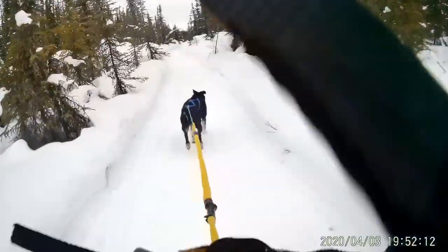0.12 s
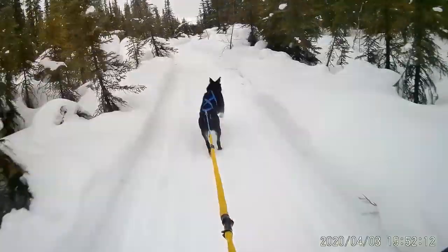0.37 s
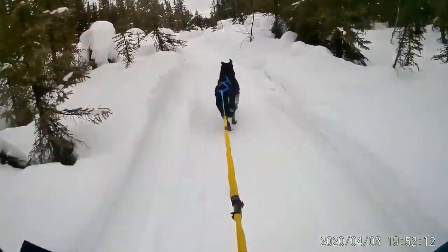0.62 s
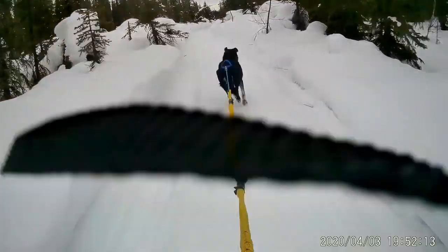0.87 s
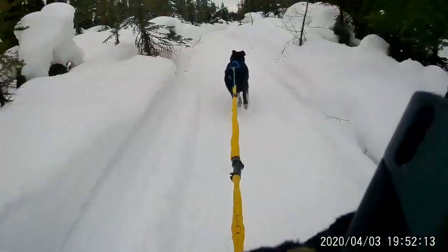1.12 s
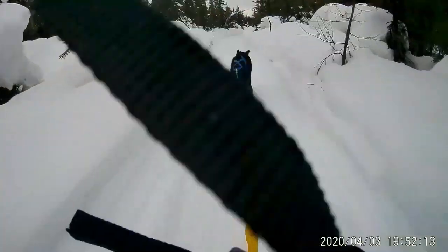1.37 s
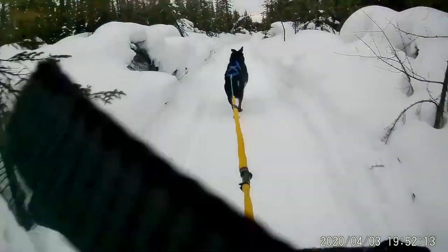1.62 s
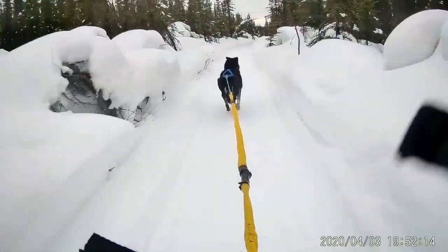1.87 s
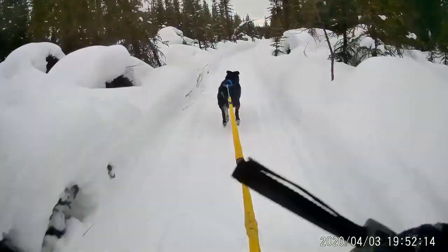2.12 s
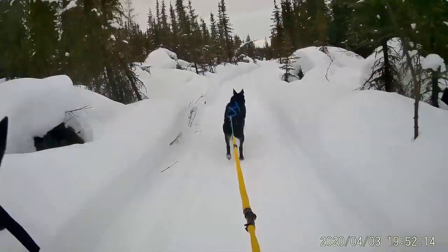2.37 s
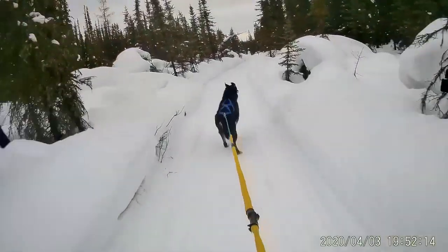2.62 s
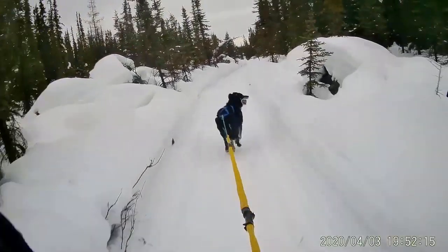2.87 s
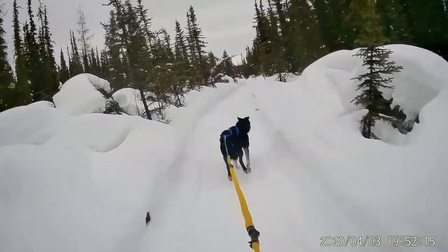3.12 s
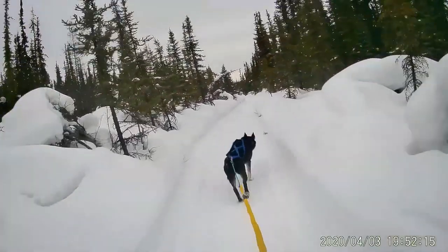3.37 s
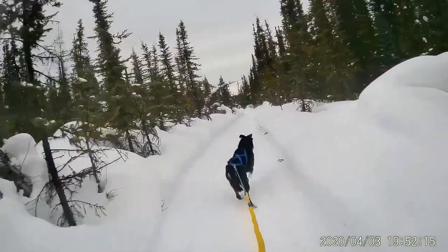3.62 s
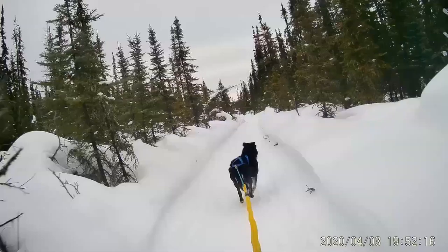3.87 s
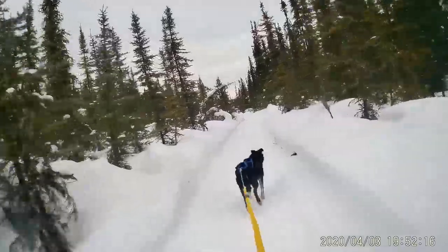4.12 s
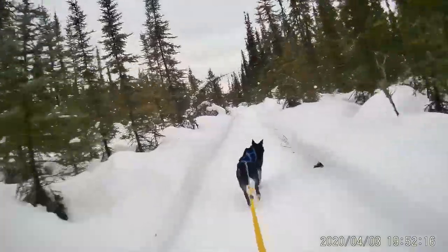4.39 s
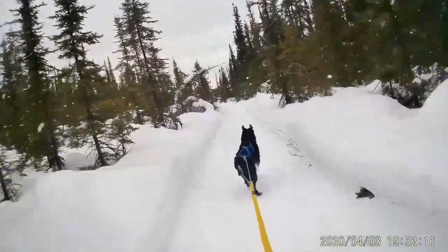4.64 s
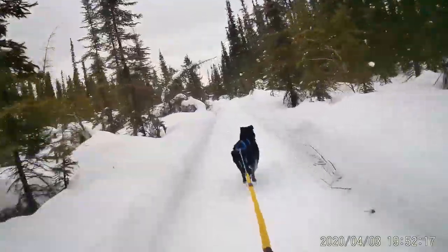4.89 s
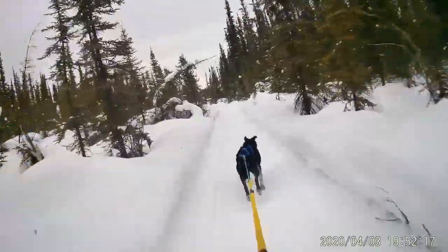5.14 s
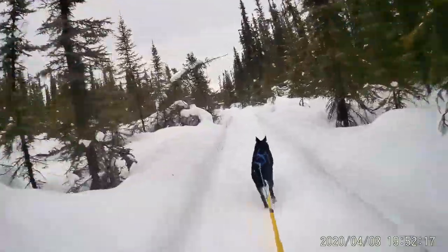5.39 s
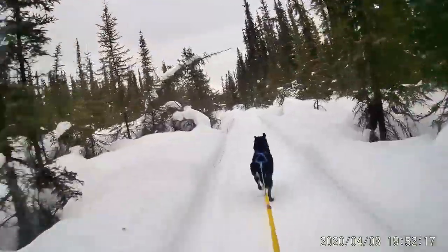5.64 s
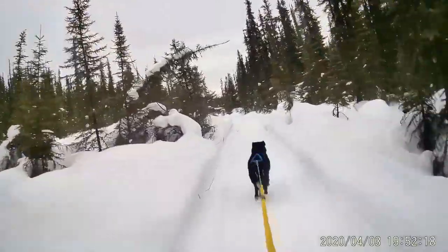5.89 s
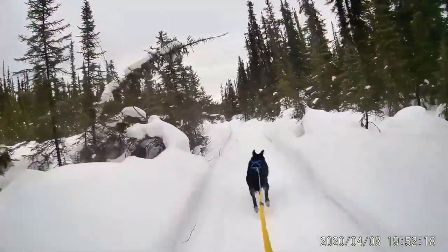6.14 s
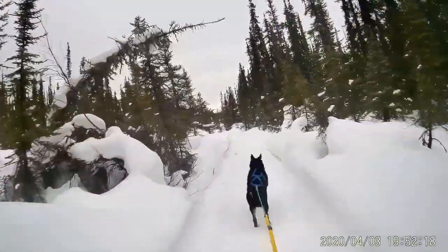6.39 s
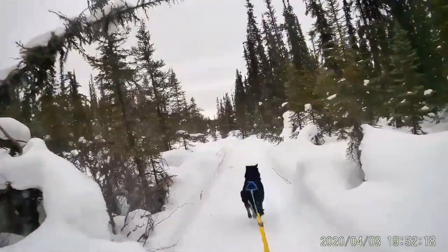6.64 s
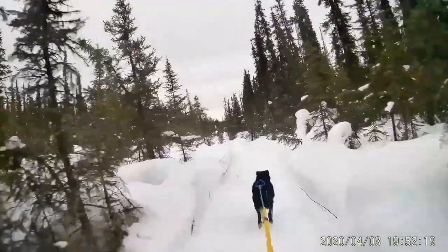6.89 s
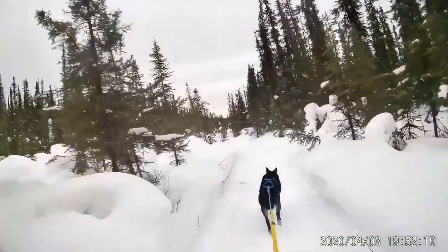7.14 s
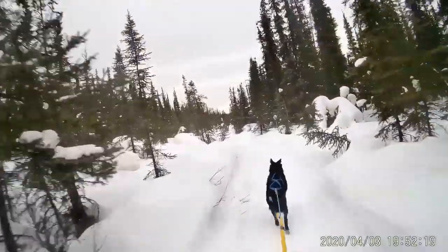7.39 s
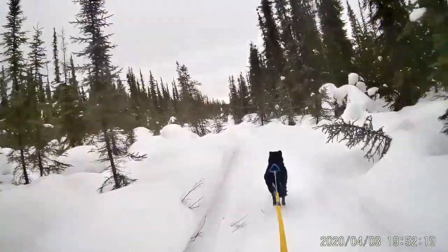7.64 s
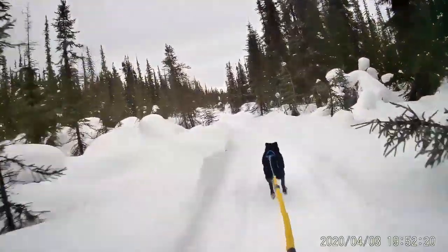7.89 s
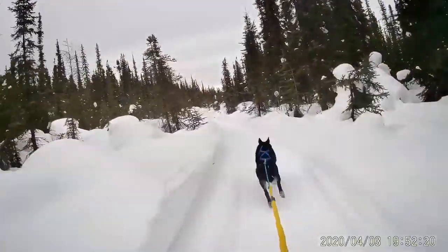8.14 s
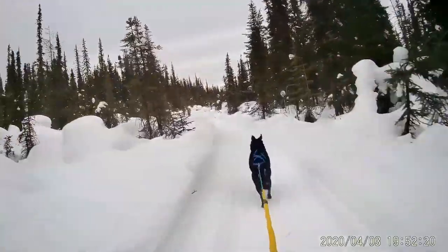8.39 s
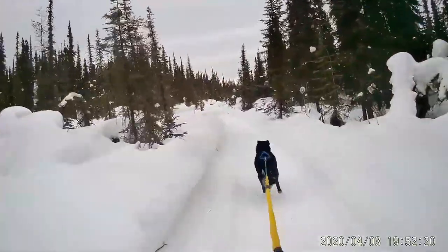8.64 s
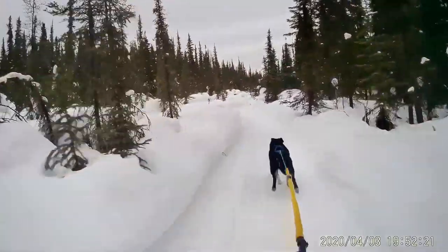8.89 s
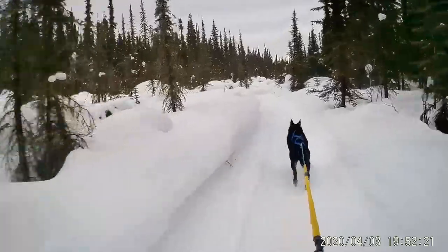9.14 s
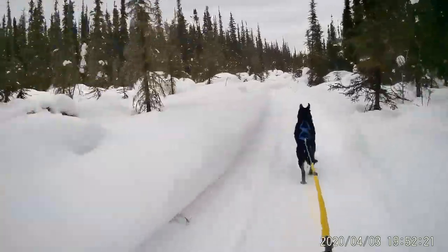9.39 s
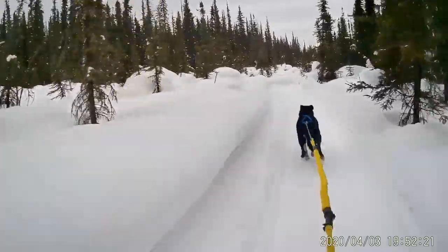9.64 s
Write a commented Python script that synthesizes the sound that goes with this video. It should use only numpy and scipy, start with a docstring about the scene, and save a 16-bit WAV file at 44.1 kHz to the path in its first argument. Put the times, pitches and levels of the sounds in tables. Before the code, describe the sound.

Right against the microphone, a strap and glove rub, knock and scrape the housing, so loud that the sound distorts. After about a second it drops sharply to the quiet, grainy hiss of skis gliding on packed snow outdoors, surging slightly, with scattered small taps, soft mount jolts, brief binding squeaks and a low wind rumble beneath.

```python
"""Skis on packed snow, from a worn camera

Skis glide over packed snow under a small camera worn by the skier; all sound reaches its one microphone through
the housing. At first a strap and a glove rub and knock on the housing hard enough to clip and lift the hiss; later
only small taps, soft jolts of the mount and short squeaks of a binding ride on the hiss and the wind rumble.
Hiss, rubbing and wind are coloured noise; knocks, jolts, squeaks and snow chirps are short shaped sines."""
import sys
import numpy as np
from scipy import signal
from scipy.fft import rfft, irfft, next_fast_len
from scipy.io import wavfile
from scipy.ndimage import uniform_filter1d, map_coordinates

SR = 44100
rng = np.random.default_rng(int(sys.argv[2]) if len(sys.argv) > 2 else 0)


def elevation(decibels):
    """Turn decibel levels (scalar or array-like) into linear amplitude ratios."""
    levels = np.asarray(decibels, float)
    return 10 ** (levels / 20)


def transcribe(u):
    """Save the signal u as a 16-bit wav file named by the first command-line argument.

    u: samples, shape (n,) or (channels, n), limited to [-1, 1]; the rate is SR.
    q: integer samples, one column per channel.
    """
    v = np.clip(np.atleast_2d(u).T, -1, 1)
    q = np.round(v * 32767).astype(np.int16)
    wavfile.write(sys.argv[1], SR, q)


N = 430416  # length in samples


def unit(x):
    """Scaled to rms 1."""
    return x / np.sqrt(np.mean(x ** 2) + 1e-20)


def wobble(rate):
    """A smooth random curve, rate knots a second."""
    knots = rng.standard_normal(int(N * rate / SR) + 4)
    return map_coordinates(knots, [np.arange(N) * rate / SR])


def along(rows):
    """One value per sample for each column after the time; -120 dB outside the table."""
    s, *columns = np.transpose(rows)
    return np.array([np.interp(np.arange(N) / SR, s, column, -120, -120) for column in columns])


def coloured(x, spectrum):
    """x filtered by a curve of (Hz, dB) points, joined on a log frequency axis, then set to rms 1."""
    m = next_fast_len(N + 8192)
    hz, db = np.transpose(spectrum)
    gain = elevation(np.interp(np.log(np.fft.rfftfreq(m, 1 / SR) + 1), np.log(hz + 1), db))
    return unit(irfft(rfft(x, m) * gain, m)[:N])


def crunch(grain_db, patchy_db, snaps=0, snap_db=0):
    """Noise broken into millisecond grains, with patches of random gain and scattered single snaps (a second)."""
    z = signal.stft(rng.standard_normal(N), nperseg=512)[2]
    across_pitch = uniform_filter1d(rng.standard_normal(z.shape), size=5, axis=0)
    patches = unit(uniform_filter1d(across_pitch, size=8, axis=1))
    patchy = signal.istft(z * elevation(patchy_db * patches), nperseg=512)[1][:N]
    grains = patchy * elevation(grain_db * wobble(300))
    clicks = (rng.random(N) < snaps / SR) * rng.laplace(size=N)
    return grains + elevation(snap_db) * clicks


def add(track, s, sound):
    """Mixes a sound into a track at a time in seconds."""
    part = track[max(round(s * SR), 0):][:len(sound)]
    part += sound[:len(part)]


def hiss():
    """Strap and glove, then the skis on snow, hiss in small surges: grainy noise, dull, bright and topmost part."""
    # level of the dull hiss; strap and glove handling lifts it in the first second,
    # then the skis on snow: [t/s, level/dB]
    dull_level = [(0, -29.5), (.11, -47), (.46, -47.5), (.76, -38.5), (.95, -47), (1.9, -53.5), (2.33, -49),
                  (2.6, -53.5), (3.26, -59), (3.99, -53), (4.51, -57), (4.65, -54), (4.78, -58.5),
                  (5.85, -53), (6.25, -57.5), (6.79, -57), (7.04, -50), (7.23, -55.5), (7.72, -60),
                  (7.94, -52), (8.05, -57.5), (9, -56), (9.38, -56), (9.76, -55.5)]
    # colours of the dull, bright and topmost parts: [f/Hz, relative gain/dB]
    dull_colour = [(180, -39.5), (300, -22.5), (602, -11.5), (658, -13.5), (920, -13.5), (1060, -10),
                   (1140, -8), (1200, -5), (1360, 0.5), (1470, -10), (1780, -10.5), (2090, -20),
                   (2600, -34.5), (3380, -53.5), (5720, -120)]
    bright_colour = [(1410, -50), (2400, -9.5), (2950, -5), (3170, -10), (3340, 0), (3660, -10),
                     (3890, -5.5), (4080, -11.5), (4420, 1.5), (4830, 1), (5610, 0.5), (6440, -11.5),
                     (7290, -9), (8200, -19), (10700, -38), (18000, -120)]
    air_colour = [(4710, -34.5), (8000, -5), (8530, -4.5), (9890, -1), (10700, -3), (11700, 1.5),
                  (14600, -6.5), (15600, -8.5)]
    (dull_db,) = along(dull_level)
    bright_db = -59 + 0.5 * (dull_db + 55)  # moves half as many dB as the dull part
    surge_db = 1.3 * wobble(16)  # uneven snow lifts and lowers both parts of the hiss at once

    dull = coloured(crunch(grain_db=2.5, patchy_db=1.5, snaps=25, snap_db=18.5), dull_colour)
    dull *= elevation(dull_db + surge_db + 0.44 * wobble(40))
    bright = coloured(crunch(grain_db=1.35, patchy_db=2.25, snaps=49, snap_db=14.5), bright_colour)
    bright *= elevation(bright_db + surge_db + 0.9 * wobble(40))
    air = coloured(crunch(grain_db=1.7, patchy_db=1.0), air_colour)
    air *= elevation(bright_db - 8.5 + 1.2 * wobble(9.7))
    return dull + bright + air + elevation(dull_db) * chirps(count=260, level_db=-10)


def chirps(count, level_db):
    """Packed snow squeaks under the skis: short soft tones between 1150 and 1650 Hz at random moments."""
    out, t = np.zeros(N), np.arange(SR // 20) / SR
    for when, pitch, size, life in rng.random((count, 4)):
        span = 0.0048 + 0.021 * life  # s
        swell = t / span * np.exp(1 - t / span * 1.15)
        tone = np.sin(2 * np.pi * (1150 + 500 * pitch ** 1.5) * t) * swell
        add(out, when * N / SR, elevation(-3.5 * np.log(size + .02)) * tone)
    return elevation(level_db) * unit(out)


def knocks():
    """Each knock rings every mode of the housing at a new strength; body, middle and treble depend on what strikes."""
    # ringing of the housing: [f/Hz, level/dB, t60 as a share of the knock's]
    housing = [(190.6, -3, 0.51), (294.4, -9, 1.5), (388, -2.5, 0.91), (650, 0.5, 0.92), (858, -3.5, 1.17),
               (1138, -6, 0.47), (1373, -5.5, 0.59), (1774, -7.5, 0.41), (2232, -11.5, 0.43),
               (2900, -8.5, 0.67), (3500, -4.5, 0.5), (4320, 2.5, .3), (5180, 3, 0.27), (5660, 1, 0.34),
               (6700, -7.5, 0.21), (7350, -6, 0.37), (8800, -14.5, 0.22), (12000, -13.5, 0.33)]
    # knocks and taps on the housing: [t/s, middle level/dB, body level/dB, treble level/dB]
    struck = [(0.0255, 1, -24, -37), (0.0594, -16.5, -21, -36), (0.1467, 0.5, -15, -32),
              (0.1547, -6.5, -26, -26), (0.2858, -16.5, -47, -37), (0.337, -9.5, -18, -22.5),
              (0.3537, -23, -59, -47), (0.4334, -14.5, -43, -40), (0.4864, -9.5, -20, -24),
              (0.5315, -14.5, -21, -26), (0.5734, -34, -36, -22), (0.6089, 15, 1, -20),
              (0.621, -6.5, -30, -15), (0.6835, 6.5, -42, -34), (0.695, -15, -26, -12.5),
              (0.7273, -6, -25, -21.5), (0.7876, 7.5, -1, -16), (0.7918, 3.5, 1.5, -5.5),
              (0.815, -6, -32, -8), (0.8459, -26, -23, -27), (0.8825, -32, -18, -30),
              (0.8914, -28, -28, -16), (1.1801, -34, -27, -51), (1.2181, -28, -51, -52),
              (1.2885, -26, -43, -34.5), (1.6696, -25, -48, -31.5), (1.8204, -33, -49, -55),
              (1.915, -45, -60, -40), (1.9455, -30, -49, -53), (2.0843, -31, -65, -39.5),
              (2.1701, -24.5, -38, -43), (2.4922, -34, -59, -41), (3.1877, -33.5, -45, -40),
              (3.5, -41, -62.5, -48), (3.7438, -32, -58, -54), (3.8551, -36, -54, -41),
              (4.0979, -32, -26, -46), (4.1684, -35, -61, -56), (4.2149, -31, -41, -49),
              (4.3073, -31, -53, -35.5), (4.418, -46, -37.5, -54), (4.814, -28, -60, -42),
              (4.8424, -31, -53, -34), (5.244, -27.5, -41.5, -63), (5.5885, -29, -39.5, -62),
              (6.1094, -31, -62, -52), (6.1422, -46, -38.5, -44), (6.7302, -33, -40, -55),
              (6.8337, -22, -36, -40.5), (7.1334, -31, -60, -49), (7.876, -30, -60, -37.5),
              (9.4375, -31, -50, -40)]
    body_hz, treble_hz = 1000, 2800  # upper edge of the body, lower edge of the treble
    knock_t60_s = 0.022

    out, t = np.zeros(N), np.arange(SR // 8) / SR
    hz, level_db, share = np.transpose(housing)[..., None]
    contact = (1 - np.exp(-t / 0.00038)) ** 2  # the blow takes a fraction of a millisecond to build
    decay_db = -60 * t / (knock_t60_s * share)
    blows = np.r_[struck, taps(count=24)]
    chance = rng.standard_normal((len(blows), 3, len(housing), 1))
    for (s, middle_db, body_db, treble_db), (strength, detune, phase) in zip(blows, chance):
        blow_db = np.select([hz < body_hz, hz < treble_hz], [body_db, middle_db], treble_db)
        ring = elevation(blow_db + level_db + 1.6 * strength + decay_db)
        start = phase * np.minimum(hz / 2500, 3)  # low modes start nearly together, high ones at random
        modes = ring * np.sin(2 * np.pi * hz * (1 + 0.037 * detune) * t + start)
        add(out, s, -contact * np.sum(modes, axis=0))
    return out


def taps(count):
    """Rows like those of the knocks, at random moments, for the faint rattle of the mount."""
    # base of a faint tap before its random strength: [middle level/dB, body level/dB, treble level/dB]
    faint_db = [-42.5, -53, -55.5]
    spread_db = 2.5  # for each factor e in the random size
    when, *size = rng.random((count, 4)).T
    return np.c_[when * N / SR, faint_db - spread_db * np.log(np.transpose(size) + .1)]


def rubbing():
    """Strap and cloth rub: grainy friction through the housing's colour, each stroke with a quick start and stop."""
    # the one long hard scrape of the strap across the housing: [t/s, body/dB, middle/dB, treble/dB]
    scrape = [(.682, -70, -70, -73.5), (.685, -21.5, -20, -31), (.701, -19, -20.5, -26.5),
              (.71, -35.5, -37, -30.5), (.722, -22.5, -26, -28), (.745, -31, -24.5, -22),
              (.762, -39, -22, -22), (.776, -28, -18, -15), (.786, -26.5, -23.5, -20),
              (.79, -9, -23, -21.5), (.803, -20.5, -27.5, -28.5), (.812, -61, -55.5, -57)]
    # single strokes of strap and cloth: [t/s, length/s, body/dB, middle/dB, treble/dB]
    rubs = [(0, 0.037, -30, -26.5, -30), (0.119, 0.084, -58, -42.5, -45.5), (0.252, 0.034, -43, -52, -60),
            (0.356, 0.039, -49, -45.5, -41), (0.444, 0.075, -43.5, -39, -44),
            (0.529, 0.061, -49, -41, -40.5), (0.624, 0.052, -46, -42, -43.5),
            (0.817, 0.019, -41.5, -35, -33.5), (0.842, 0.022, -40, -28.5, -39.5),
            (.879, 0.013, -24.5, -25.5, -30.5), (1.142, 0.019, -63, -45, -50.5),
            (1.171, 0.015, -37, -33, -42.5), (1.193, 0.048, -48, -48, -46.5),
            (1.661, 0.052, -42.5, -49, -53.5), (1.724, 0.053, -46.5, -55, -58),
            (1.807, 0.02, -41, -50, -51), (1.915, 0.03, -63, -45, -47), (2.482, 0.025, -74, -42.5, -52),
            (3.497, 0.013, -71, -46, -60), (3.752, 0.053, -65, -61, -54), (4.388, 0.064, -60.5, -55, -54),
            (4.826, 0.034, -56.5, -47.5, -48), (5.755, 0.027, -56, -51, -54.5),
            (6.731, 0.042, -55.5, -50, -58), (6.85, 0.2, -68, -54.5, -55.5),
            (9.447, 0.013, -61, -44.5, -57), (9.637, 0.026, -60.5, -50, -56.5)]
    # colour of the rubbing in the body, middle and treble of the housing: each [f/Hz, relative gain/dB]
    rub_colours = [
        [(60, -120), (150, -6.5), (400, -10.5), (680, -4.5), (900, -2), (1300, -120)],
        [(700, -120), (1050, -1), (1380, 5.5), (1900, -1.5), (2500, -12.5), (3500, -120)],
        [(1800, -120), (2600, -7), (3400, -3.5), (4000, -10), (4700, 3), (5700, -2), (6500, -13), (7500, -12),
         (9000, -17), (12000, -21), (16000, -33)],
    ]

    strokes, t = elevation(along(scrape)), np.arange(SR // 3) / SR
    for s, length, *levels_db in rubs:
        stroke = (1 - np.exp(-t / 0.00054)) * np.exp(-np.maximum(t - length, 0) / 0.0055)
        for track, db in zip(strokes, levels_db):
            add(track, s, elevation(db) * stroke)
    slips = elevation(2.4 * wobble(130))  # the strap catches and lets go
    friction = np.zeros(N)
    for track, colour in zip(strokes, rub_colours):
        grit = crunch(grain_db=2.0, patchy_db=5.0, snaps=400, snap_db=15)
        friction += track * coloured(grit, colour)
    return slips * friction


def jolts():
    """The mount swings a few soft cycles after each bump; a harder jolt is damped sooner."""
    # jolts of the mount: [t/s, level/dB, f/Hz]
    bumps = [(0.009, -15.5, 55.4), (0.482, -24, 109), (0.528, -23, 120), (0.601, -18, 80), (0.7, -11.5, 88),
             (0.788, -7, 147), (0.819, -13.5, 143), (0.878, -19.5, 109), (1.173, -32, 95),
             (1.209, -31, 56.5), (1.665, -30, 57), (2.116, -26, 56), (2.158, -33, 64.6), (4.093, -33, 85.6),
             (4.411, -37, 64.6), (5.793, -33.5, 105), (6.141, -30.5, 107.5), (6.393, -33, 98.5),
             (6.821, -28.5, 110), (7.214, -36, 95), (7.593, -36.5, 106), (8.558, -32, 110)]
    out, t = np.zeros(N), np.arange(SR // 4) / SR
    for s, db, hz in bumps:
        t60_ms = max(142 - 2.5 * (db + 35), 20)  # 142 ms at -35 dB, 2.5 ms less for each dB above
        swing = np.sin(2 * np.pi * hz * t) * (1 - np.exp(-t / 0.0024))
        add(out, s, elevation(db - 60000 * t / t60_ms) * swing)
    return out


def squeaks():
    """A binding's stick-slip at a nearly steady rate: a few overtones, rough in pitch and strength."""
    # squeaks of a binding: [t/s, length/s, f/Hz, fundamental level/dB, overtones level/dB]
    slipping = [(2.489, 0.026, 650, -71, -55), (3.739, 0.079, 590, -47, -37.5),
                (4.405, 0.034, 570, -48, -46), (5.355, 0.053, 595, -69, -50.5),
                (5.819, 0.055, 600, -53, -54), (5.99, .03, 587, -64, -46.5), (6.095, 0.031, 710, -59, -47),
                (6.918, 0.021, 692, -68, -34.5), (6.945, 0.033, 605, -70, -43),
                (7.128, 0.019, 590, -63, -37.5), (7.974, 0.016, 680, -64, -40.5),
                (8.341, 0.039, 684, -62.5, -46.5), (8.805, 0.022, 675, -66, -42)]
    # second to fifth partial, on top of the overtones' level: [level/dB]
    partials_db = [1, -15.5, -34, -20.5]

    out, unsteady, flutter = np.zeros(N), wobble(90), wobble(120)
    for s, length, hz, fundamental_db, overtones_db in slipping:
        t = np.arange(round(length * SR)) / SR
        now = slice(round(s * SR), round(s * SR) + len(t))
        phase = 2 * np.pi * hz * t + 0.35 * unsteady[now]
        tone = elevation(fundamental_db) * np.sin(phase)
        for partial, db in enumerate(partials_db, start=2):
            tone += elevation(overtones_db + db) * np.sin(partial * phase)
        fades = np.minimum(1, np.minimum(t / 0.0034, (length - t) / 0.0074))
        add(out, s, elevation(2.5 * flutter[now] - 8 * t / length) * tone * fades)
    return out


def wind():
    """Wind and handling rumble on the microphone port: low noise that slowly swells and sinks."""
    # wind and handling on the port: [t/s, level/dB]
    gusts = [(0, -21), (.11, -41.5), (.27, -41), (.5, -49), (.76, -23), (.87, -28), (.95, -45),
             (1.3, -43.5), (1.5, -48), (1.76, -41.5), (1.9, -50), (2.2, -43.5), (2.6, -50), (4.2, -48.5),
             (5.25, -50.5), (7, -49), (8.2, -51), (9.76, -48.5)]
    # colour of the rumble: [f/Hz, relative gain/dB]
    rumble_colour = [(8.8, -24), (15, 4), (87, -12), (117, -13), (152, -17), (280, -21), (700, -31),
                     (910, -55.5), (1540, -120)]
    (rumble_db,) = along(gusts)
    return elevation(rumble_db + 1.43 * wobble(8.3)) * coloured(rng.standard_normal(N), rumble_colour)


def scene():
    """Everything heard at the one microphone, as a single channel."""
    return (hiss() + knocks() + rubbing() + jolts() + squeaks() + wind())[None]


def roll_off(x):
    """The treble ends steeply here."""
    return signal.sosfilt(signal.butter(12, 15720, fs=SR, output="sos"), x)


def record(dry):
    """The microphone input clips, a little lower on the positive side."""
    clipped = np.clip(dry, -1, .9)
    return roll_off(clipped)


dry = scene()
out = record(dry)
transcribe(out)
```